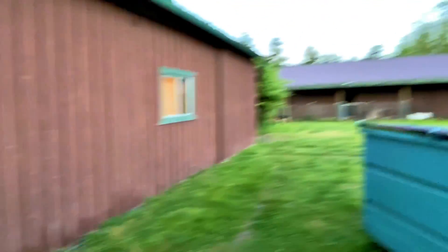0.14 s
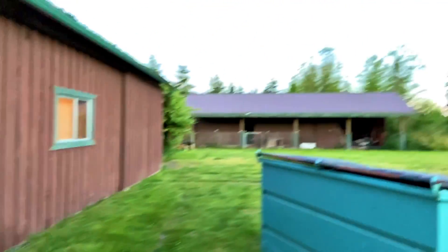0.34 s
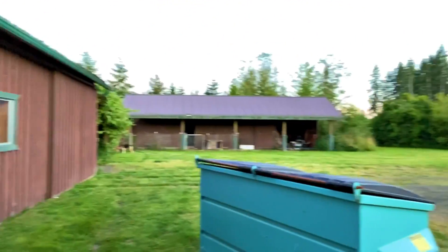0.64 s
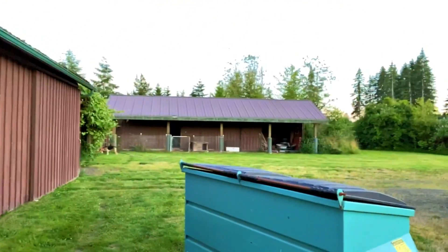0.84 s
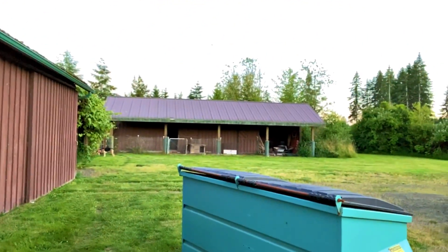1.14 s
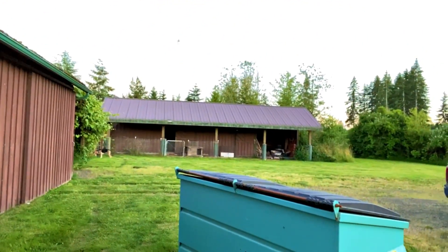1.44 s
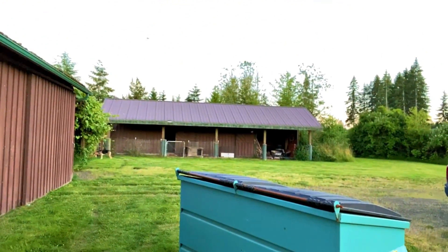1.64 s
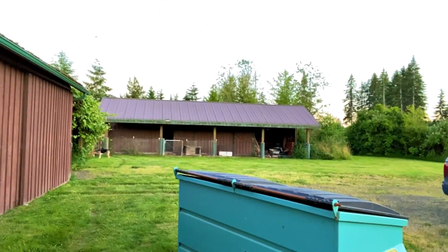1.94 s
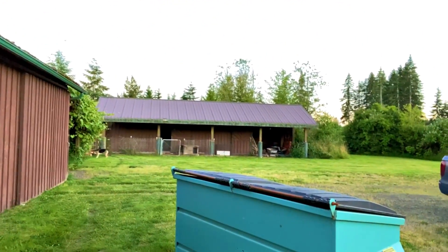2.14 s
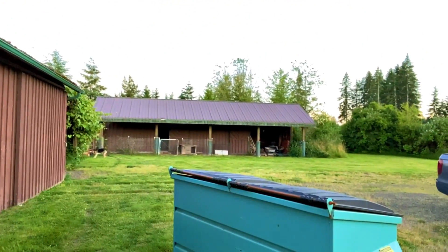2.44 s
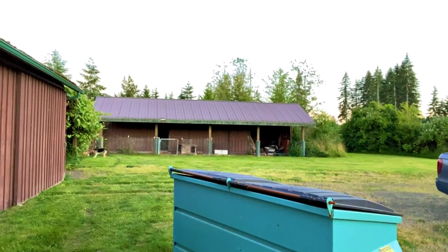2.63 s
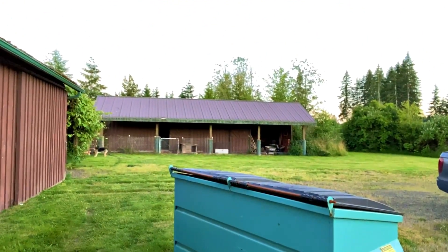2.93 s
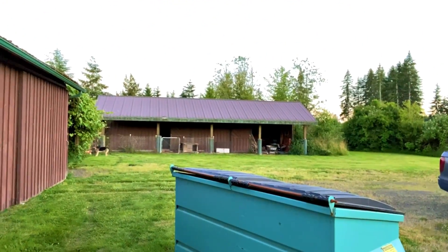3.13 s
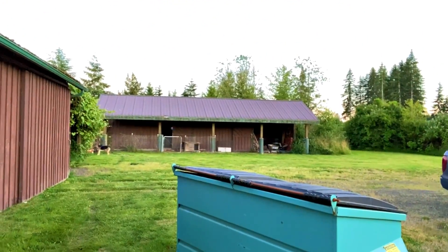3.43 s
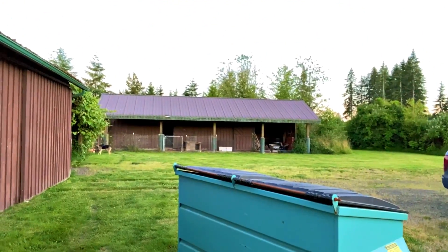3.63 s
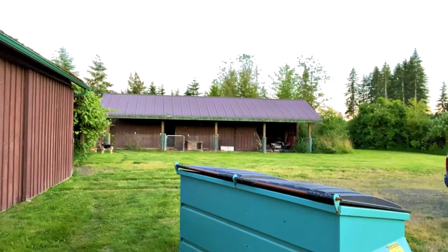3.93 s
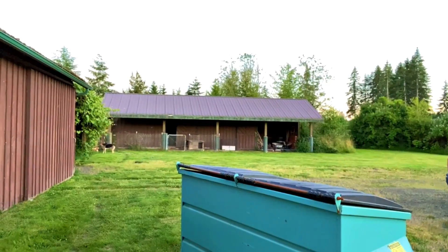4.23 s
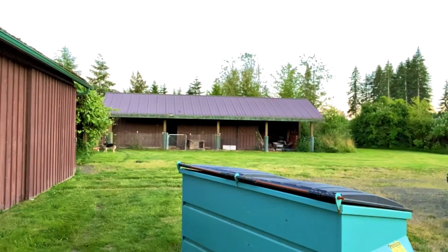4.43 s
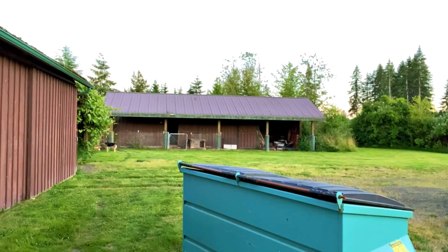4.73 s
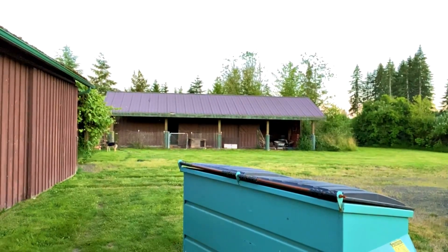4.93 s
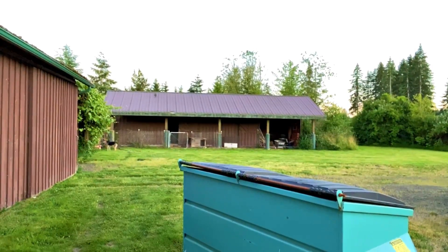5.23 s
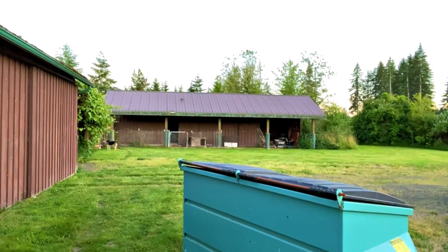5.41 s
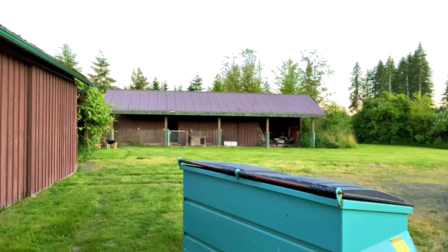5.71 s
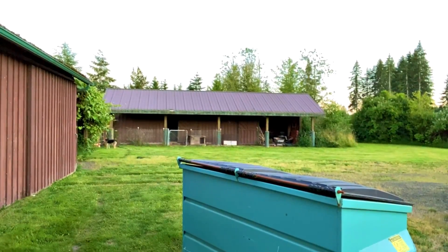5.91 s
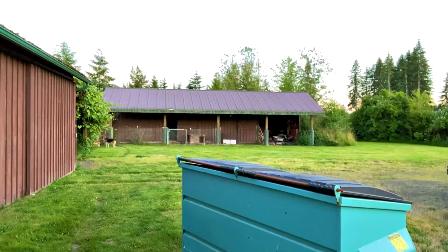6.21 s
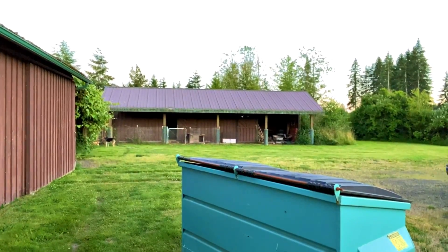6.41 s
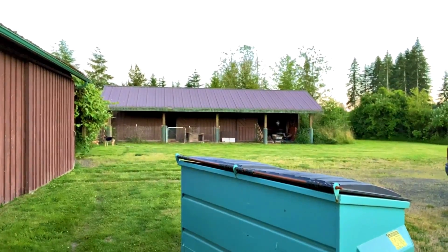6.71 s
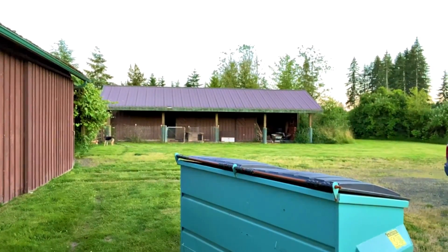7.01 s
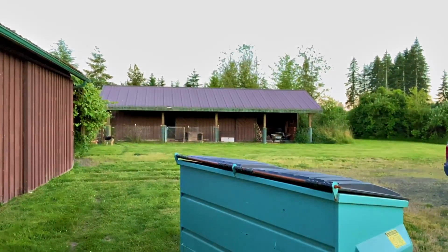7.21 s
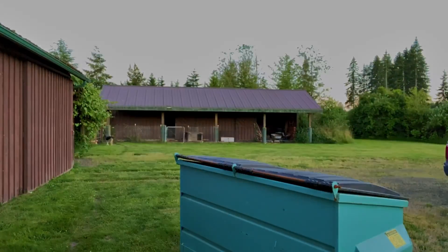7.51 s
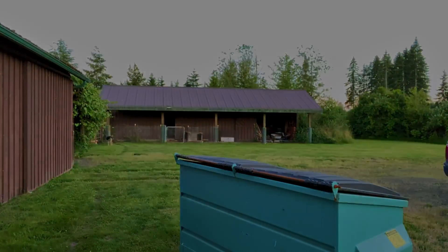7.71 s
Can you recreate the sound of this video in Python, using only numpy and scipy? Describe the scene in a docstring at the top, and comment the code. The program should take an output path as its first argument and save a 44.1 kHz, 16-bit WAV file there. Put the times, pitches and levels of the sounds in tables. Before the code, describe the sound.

High thin bird chirps come in short clusters outdoors, lightly echoing off barns, above a low far-off road rumble, fading near the end.

```python
"""Swallows twitter over a farmyard: most chirps pair two quick pitch arches, one from each side of the syrinx,
and some use the upper voice alone. Each arch is a frequency-modulated sine, answered by walls and trees.
A shoe scuffs nearby as bursts of filtered noise, and other birds sing far off as gliding, wavering sines.
Distant traffic, shaped noise with an engine drone, lies under everything. Towards the end the whole scene fades,
and it stops before the fade is complete."""
import sys
import numpy as np
from scipy import signal
from scipy.fft import rfft, irfft, next_fast_len
from scipy.io import wavfile
from scipy.ndimage import map_coordinates

SR = 44100
rng = np.random.default_rng(int(sys.argv[2]) if len(sys.argv) > 2 else 0)


def master_out(mix):
    """Clip the mix to full scale and print it as 16-bit PCM to the path in sys.argv[1]."""
    frames = np.transpose(np.atleast_2d(mix))
    ceiling = np.clip(frames, -1, 1)
    pcm = np.round(ceiling * 32767).astype(np.int16)
    wavfile.write(sys.argv[1], SR, pcm)


N = 346313

# direction of the calling swallow as an interaural delay: (time [s], lead of the left microphone [ms])
SWALLOW_BEARING = [(.15, -.1), (.8, .12), (1.25, .2), (1.39, -.17), (2.2, .14), (2.67, .19), (2.76, 0),
                   (2.82, .15), (5, .14), (5.45, 0), (6.2, 0), (6.7, .15)]
# two-voiced chirps, levels before each voice's offset and the echo cap: (start [s], length [s],
# lower top [Hz], lower level [dB], upper top [Hz], upper level [dB], barn echo delay [s], barn echo level [dB])
TWO_VOICED_CHIRPS = [(0.073, 0.05, 5110, -40.5, 6870, -47.5, 0.018, -15),
                     (0.19, 0.044, 5080, -38.5, 7040, -50, 0.017, 2),
                     (0.783, 0.053, 5170, -43, 7080, -55.5, 0.014, -20),
                     (0.874, 0.053, 5070, -42, 6980, -55, 0.024, -2.0),
                     (0.958, 0.06, 5490, -39.5, 6600, -56.5, 0.034, -2.5),
                     (1.149, 0.05, 4730, -49.5, 7500, -52, 0.013, -1),
                     (1.251, 0.047, 5230, -41, 6300, -45, 0.039, -3.8),
                     (1.282, 0.05, 5230, -36, 7050, -45, 0.013, -7),
                     (1.39, 0.048, 5270, -33.5, 6850, -44, 0.024, -4),
                     (1.758, 0.058, 5180, -42, 6780, -50.5, 0.026, -2.7),
                     (1.865, 0.061, 5160, -40.5, 7050, -49.5, 0.02, 4),
                     (2.146, 0.056, 5360, -47.5, 7200, -54.5, 0.075, -5),
                     (2.23, 0.055, 5600, -45.5, 7420, -42.5, 0.025, 9),
                     (2.363, 0.065, 5480, -43, 7400, -41.5, 0.03, -5),
                     (2.67, 0.055, 4840, -55, 6970, -61.8, 0.069, -2.0),
                     (2.767, 0.051, 5260, -39, 6850, -49, 0.019, -5),
                     (2.8, 0.044, 5500, -39, 7600, -38, 0.07, 1),
                     (2.888, 0.042, 5600, -33.9, 7580, -37, 0.059, -11.3),
                     (3.012, 0.05, 5600, -37, 7370, -39, 0.047, -9),
                     (3.505, 0.052, 5310, -38.5, 7060, -47.5, 0.049, -2),
                     (3.583, 0.062, 5440, -37, 7080, -39, 0.058, -11),
                     (3.734, 0.08, 5410, -37.5, 7130, -39, 0.046, -7),
                     (4.117, 0.053, 5370, -41, 7070, -49, 0.03, -2),
                     (4.207, 0.06, 5220, -42, 7110, -48, 0.0094, -8.1),
                     (4.327, 0.061, 5200, -46.5, 7040, -44, 0.03, -6.8),
                     (4.409, 0.052, 5420, -37.5, 7220, -40.5, 0.04, -9),
                     (4.495, 0.048, 5420, -41, 7260, -47, 0.032, -27),
                     (4.594, 0.054, 5250, -40.5, 7180, -48, 0.014, -18.1),
                     (4.759, 0.074, 5280, -47.1, 6440, -56.5, 0.02, -4.6),
                     (4.886, 0.058, 5280, -44, 7100, -47, 0.069, 0),
                     (4.962, 0.062, 5500, -41, 7140, -45.5, 0.016, -3.7),
                     (5.454, 0.052, 5150, -39, 6720, -46, 0.015, -11),
                     (5.544, 0.047, 5170, -35, 6960, -47.5, 0.0084, 5),
                     (5.7, 0.056, 4970, -38.5, 7200, -46, 0.073, 3),
                     (5.796, 0.05, 5480, -32, 7070, -43, 0.027, -7),
                     (6.066, 0.049, 5190, -39.9, 6920, -48, 0.021, -10),
                     (6.165, 0.048, 5130, -37, 7150, -48.5, 0.036, -17),
                     (6.724, 0.056, 5320, -41.5, 7260, -44, 0.022, -11),
                     (6.803, 0.059, 5550, -36.5, 7170, -37.5, 0.016, -14),
                     (6.833, 0.049, 5330, -34, 7470, -55, 0.027, -8),
                     (6.927, 0.062, 5390, -35, 7190, -39.5, 0.028, -5),
                     (7.745, 0.055, 5100, -49, 7440, -55, 0.051, -3.8),
                     (7.82, 0.097, 5380, -36.5, 7100, -45, 0.04, -6)]


def amp(db):
    """A level in decibels is twenty times the logarithm of the amplitude ratio returned here."""
    return 10 ** (np.asarray(db) / 20)


def unit(x):
    """Normalisation by the root mean square gives signals equal power."""
    return x / np.sqrt(np.mean(x ** 2) + 1e-20)


def curve(rows, t):
    """Piecewise linear interpolation of (position, value) rows."""
    return np.interp(t, *np.transpose(rows))


def along(points, hz):
    """Interpolation of (frequency, value) points on a logarithmic frequency axis."""
    f, v = np.transpose(points)
    return np.interp(np.log(hz + 1), np.log(f + 1), v)


def wobble(rate, size):
    """Band-limited random modulation: a spline through normal deviates, rate knots a second."""
    knots = rng.standard_normal(int(size * rate / SR) + 4)
    return map_coordinates(knots, [np.arange(size) * rate / SR])


def filtered(x, response):
    """Linear filtering as multiplication of the spectrum by a frequency response."""
    n = x.shape[-1]
    m = next_fast_len(n + 4096)
    return irfft(rfft(x, m) * response(np.fft.rfftfreq(m, 1 / SR)), m)[..., :n]


def add(out, start_s, x):
    """Superposition: x is summed into out from start_s on."""
    i = max(round(start_s * SR), 0)
    part = out[..., i:i + x.shape[-1]]
    part += x[..., :part.shape[-1]]


def span(length_s):
    """Normalised time within a note, from -1 to 1."""
    return np.linspace(-1, 1, max(int(length_s * SR), 2))


def tail():
    """Diffuse reverberation of unit energy: sparse reflections over a haze, decaying faster in the treble."""
    # reverberation time of the yard: (frequency [Hz], time to fall by 60 dB [s])
    decay_times = [(2500, 0.46), (6000, 0.36), (12000, 0.12)]
    size = SR // 2
    # 450 answers a second from posts, trunks and eaves; the haze is grass and leaves
    spikes = rng.random((2, size)) < 450 / SR
    noise = rng.standard_normal((2, size)) * (spikes + amp(-15) / 2)
    hz, t, z = signal.stft(noise, SR, nperseg=256)
    decay = amp(-60 * t / along(decay_times, hz)[:, None])
    build_up = 1 - np.exp(-t / .007)
    x = signal.istft(z * decay * build_up, SR, nperseg=256)[1][:, :size]
    return x / np.linalg.norm(x, axis=1, keepdims=True)


def yard(x, lead_ms, echo_s, echo_db, wet_db, wall_db):
    """Outdoor propagation: direct path, a barn echo, three far walls and a diffuse tail by convolution."""
    response = amp(wet_db) * tail()
    far = np.geomspace(.05, .12, 3) * rng.uniform(.8, 1.25, 3)
    far_db = wall_db - 10 * np.log10(far / far[0])
    # the barn returns at most -5 dB of a call
    for delay, db in [(echo_s, min(echo_db, -5)), *zip(far, far_db)]:
        for channel in response:
            # each wall lies in a direction of its own
            add(channel, delay + rng.uniform(0, .0001), amp([db]))
    out = signal.fftconvolve(x[None], response, axes=1)
    # opposite phase slopes make the direct sound reach one microphone first
    ears = np.array([[1], [-1]])
    direct = filtered(x, lambda hz: np.exp(1j * np.pi * hz * lead_ms / 1000 * ears))
    add(out, 0, direct)
    return out


def air(spectrum, flutter_db):
    """Mid-side noise with a mid of rms 1: the frequency-dependent side is weak in the bass, strongest near 1 kHz."""
    # stereo width: (frequency [Hz], side minus mid [dB])
    width = [(60, -13.5), (150, -8), (380, 0.5), (950, 10), (2380, -1.5), (5980, 1)]
    pair = rng.standard_normal((2, N)) * amp(flutter_db * wobble(14, N))
    mid, side = filtered(pair, lambda hz: amp(along(spectrum, hz)) * [np.ones_like(hz), amp(along(width, hz))])
    return np.array([mid + side, mid - side]) / np.std(mid)


def distance():
    """Far traffic as shaped random noise: rumble, unsteady engine drone, wash a little to the left, tyre swish."""
    # noise spectra: (frequency [Hz], relative spectral level [dB])
    rumble_spectrum = [(22, -24), (59, -1), (75, -2.5), (123, -4.5), (156, -15), (220, -30.5), (290, -41.5),
                       (480, -120)]
    wash_spectrum = [(100, -35), (170, -4), (579, -12), (696, -8.5), (1000, -19), (1100, -26.5),
                     (3200, -28.5), (7940, -33), (9360, -59), (10800, -32), (13200, -41.5), (14300, -50.5)]
    tyre_spectrum = [(450, -22), (800, 0), (1200, -2), (1800, -12), (3000, -30)]
    # level courses; the first is shared by rumble and drone ahead of their offsets: (time [s], level [dB])
    bass_level = [(0, -52), (.5, -53.5), (.65, -58), (3.15, -60), (5.08, -58.5), (5.2, -52.5), (5.6, -60.5),
                  (6.6, -58.5), (7.1, -59.5)]
    wash_level = [(0, -64.5), (1.1, -61.5), (1.6, -65), (4.3, -64.5), (7, -66)]
    tyre_level = [(0, -74), (.7, -73), (1.6, -77.5), (4.1, -78.5), (4.4, -70), (4.8, -85)]
    t = np.arange(N) / SR
    drone_hz = 78 + 2 * wobble(7.4, N)
    drone = np.sin(2 * np.pi * np.cumsum(drone_hz) / SR) * amp(2.8 * wobble(8.2, N))
    bass = amp(-1) * air(rumble_spectrum, flutter_db=1.0) + amp(-6) * unit(drone)
    wash = amp(curve(wash_level, t)) * air(wash_spectrum, flutter_db=.8)
    wash_pan = amp([[.71], [-.71]])
    tyres = amp(curve(tyre_level, t)) * air(tyre_spectrum, flutter_db=.8)
    return amp(curve(bass_level, t)) * bass + wash * wash_pan + tyres


def far_birds():
    """Frequency modulation: slow arches give whistles, rapid random deviation gives hoarse buzzes."""
    # distant notes, the last a low falling hoot: (start [s], length [s], first pitch [Hz], last pitch [Hz],
    # rise of the arch [Hz], scale of the random deviation [Hz], level before the offset [dB])
    notes = [(.66, .14, 4200, 4300, 0, 500, -70), (1.52, .38, 2480, 2480, 0, 70, -75),
             (2.0, .055, 4500, 6050, 700, 140, -53), (3.18, .09, 2800, 2000, 220, 5, -67),
             (3.3, .07, 2750, 2400, 170, 10, -68), (5.04, .16, 3600, 3550, 0, 220, -70),
             (5.19, .27, 4150, 4400, 0, 180, -72), (6.795, .08, 510, 320, -40, 25, -58)]
    offset_db = -3
    out = np.zeros((2, N))
    for start_s, length_s, first_hz, last_hz, arch_hz, depth_hz, db in notes:
        n = len(span(length_s))
        u = np.linspace(0, 1, n)
        glide = first_hz + (last_hz - first_hz) * u ** 2 + arch_hz * np.sin(np.pi * u)
        hz = glide + depth_hz * wobble(500, n)
        envelope = amp(db + offset_db) * signal.windows.tukey(n, .5)
        note = envelope * np.sin(2 * np.pi * np.cumsum(hz) / SR)
        add(out, start_s, yard(note, lead_ms=0, echo_s=.03, echo_db=-16, wet_db=-8, wall_db=-20))
    return out


def scuffs():
    """Stick-slip friction: grit crackles as noise whose level varies while a sole catches and slips."""
    # a dull footfall and shoe scuffs: (start [s], length [s], rms level before the swell [dB],
    # spectral tilt [dB per octave], lower edge [Hz])
    slides = [(0.063, 0.02, -50, -12.5, 250), (0.317, 0.077, -57.5, -9.5, 920),
              (0.334, 0.021, -53.5, -15, 1760), (.481, 0.014, -62, -20, 2410), (2.265, 0.071, -42, 0, 690),
              (2.261, 0.3, -48.5, -2, 515), (2.44, 0.49, -63.5, -1.5, 497)]
    # spectrum of the grit before tilt and edge: (frequency [Hz], relative spectral level [dB])
    grit = [(240, -40), (400, 0), (821, -10), (1200, -16.5), (3740, -9), (5070, -9.5), (8400, -7),
            (9350, -30), (11900, -5), (15500, -32.5)]
    out = np.zeros((2, N))
    for start_s, length_s, db, tilt_db, edge_hz in slides:
        n = len(span(length_s))
        crackle_db = 3 * wobble(1500, n)
        catch_db = 2.2 * wobble(120, n)
        grains = rng.standard_normal((2, n)) * amp(crackle_db + catch_db)

        def response(hz):
            high_pass = hz ** 4 / (hz ** 4 + edge_hz ** 4)
            return amp(along(grit, hz) + tilt_db * np.log2((hz + 500) / 4000)) * high_pass

        swell = np.sin(np.linspace(0, np.pi, n))
        add(out, start_s, amp(db) * unit(filtered(grains, response)) * swell)
    return out


def whistle(hz):
    """One side of the syrinx: a jittered sine whose rough second harmonic strengthens from 5 to 5.5 kHz."""
    phase = 2 * np.pi * np.cumsum(hz * (1 + .01 * wobble(400, len(hz)))) / SR
    strain = np.interp(hz, [5000, 5500], [.2, 1])
    hoarse = .5 + wobble(2400, len(hz))
    return np.sin(phase) + amp(-19) * strain * hoarse * np.sin(2 * phase)


def low_voice():
    """Symmetric frequency modulation: short round arches inside each chirp, loudest around the top."""
    # envelope of an arch: (share of the note [0 to 1], level [dB])
    swell_shape = [(0, -12), (.25, -2.5), (.5, .5), (.75, 0), (1, -10)]
    late_s, early_s = .011, .018  # starts later and stops earlier than the chirp
    foot_hz = 3250  # pitch at both ends of the arch
    offset_db = .5
    out = np.zeros((2, N))
    for start_s, length_s, top_hz, db, _, _, echo_s, echo_db in TWO_VOICED_CHIRPS:
        u = span(length_s - late_s - early_s)
        hz = top_hz - (top_hz - foot_hz) * np.abs(u) ** rng.uniform(2.2, 3)
        swell = amp(db + offset_db + curve(swell_shape, (u + 1) / 2)) * signal.windows.tukey(len(u), .15)
        lead_ms = curve(SWALLOW_BEARING, start_s)
        call = yard(swell * whistle(hz), lead_ms, echo_s, echo_db, wet_db=-6, wall_db=-15)
        add(out, start_s + late_s, call)
    return out


def high_arch(length_s, top_hz, sag_hz, shape):
    """Asymmetric frequency modulation: exponential upstroke, variably sagging top, power-law downstroke."""
    rise_hz, rise_s = 3300, .005  # upstroke depth and time constant
    fall_hz, fall_s = 2500, .017  # downstroke depth and duration
    release_s = .003  # the downstroke runs on while it dies away
    t = np.arange(int((length_s + release_s) * SR)) / SR
    u = t / length_s
    dip = rng.uniform(.5, 1.5) * np.exp(-((u - .4) / .18) ** 2)
    fall = np.maximum(1 + (t - length_s) / fall_s, 0) ** 1.7
    hz = top_hz - rise_hz * np.exp(-t / rise_s) - sag_hz * dip - fall_hz * fall
    flutter_db = 2 * wobble(150, len(t))
    swell = amp(curve(shape, u) + flutter_db) * signal.windows.tukey(len(t), .12)
    return swell * whistle(hz)


def high_voice():
    """Independent second oscillator: it sags and softens over the lower voice, and alone sings a plainer arch."""
    # chirps of the upper voice alone: (start [s], length [s], top [Hz], level before the offset [dB])
    solos = [(1.193, 0.057, 7320, -53.5), (1.485, 0.037, 7200, -53.5), (2.47, 0.04, 7470, -41.5),
             (2.879, 0.054, 6310, -39), (2.968, 0.042, 6970, -42), (3.074, 0.038, 7150.0, -37.5),
             (3.117, 0.042, 7260, -38.5), (3.158, 0.045, 6680, -40.5), (3.287, 0.046, 6720, -43.5),
             (3.367, 0.053, 6700, -44), (3.847, 0.051, 7090, -41.5), (3.89, 0.048, 7300.0, -48),
             (7.041, 0.034, 7420, -42.2)]
    # envelopes in company and alone: (share of the note [0 to 1], level [dB])
    paired_swell = [(0, -10), (.15, -2.5), (.4, -11), (.68, -3), (.86, 4), (1, -7)]
    solo_swell = [(0, -8), (.2, -2.5), (.6, -4), (.86, 4.5), (1, -7)]
    paired_sag_hz, solo_sag_hz = 600, 150  # mean dip below the top
    paired_offset_db, solo_offset_db, echo_offset_db = -.5, -1.5, .5
    arches = []
    for start_s, length_s, _, _, top_hz, db, echo_s, echo_db in TWO_VOICED_CHIRPS:
        arch = high_arch(length_s, top_hz, paired_sag_hz, paired_swell)
        arches.append((start_s, db + paired_offset_db, echo_s, echo_db + echo_offset_db, arch))
    for start_s, length_s, top_hz, db in solos:
        arch = high_arch(length_s, top_hz, solo_sag_hz, solo_swell)
        arches.append((start_s, db + solo_offset_db, rng.uniform(.02, .05), -16, arch))
    out = np.zeros((2, N))
    for start_s, db, echo_s, echo_db, arch in arches:
        lead_ms = curve(SWALLOW_BEARING, start_s)
        add(out, start_s, yard(amp(db) * arch, lead_ms, echo_s, echo_db, wet_db=-5, wall_db=-19))
    # the upper voice lies a little to the right
    return out * amp([[-1.1], [1.1]])


def scene():
    """Linear superposition of the traffic, far birds, scuffs and both swallow voices."""
    return distance() + far_birds() + scuffs() + low_voice() + high_voice()


def record(dry):
    """A linear fade, then low-pass filtering: the top treble rolls off and nothing passes the band limit."""
    fade_start_s, fade_s = 7.05, 1.13  # the scene stops before the full fade has run
    limit_hz, rolloff_hz = 15750, 14000
    fade = np.clip(1 - (np.arange(N) / SR - fade_start_s) / fade_s, 0, 1)
    return filtered(dry * fade, lambda hz: (hz < limit_hz) / (1 + (hz / rolloff_hz) ** 36))


dry = scene()
out = record(dry)
master_out(out)
```